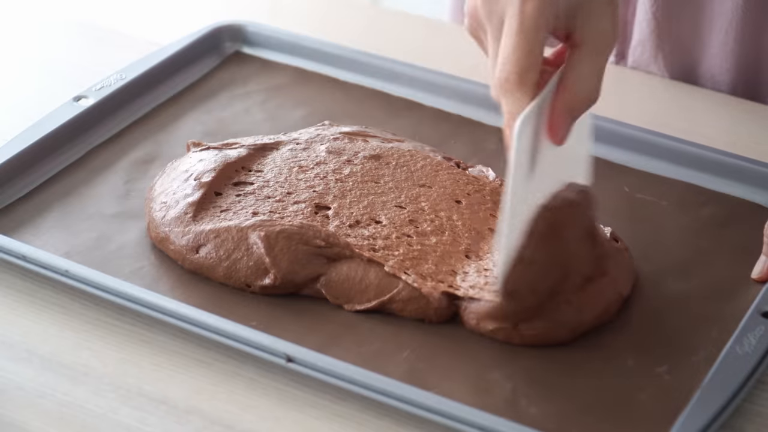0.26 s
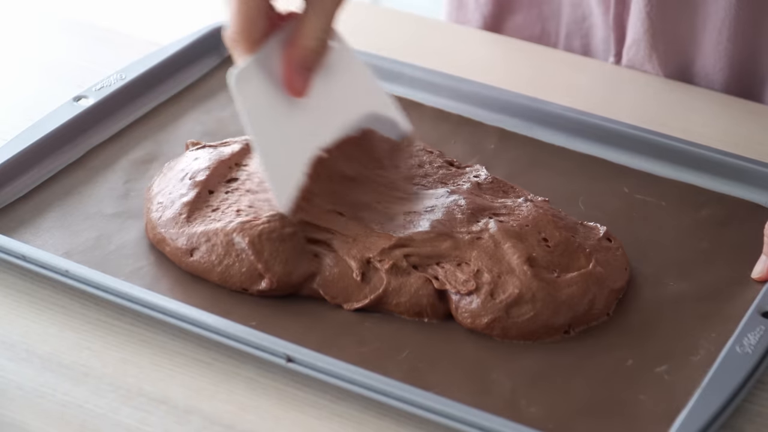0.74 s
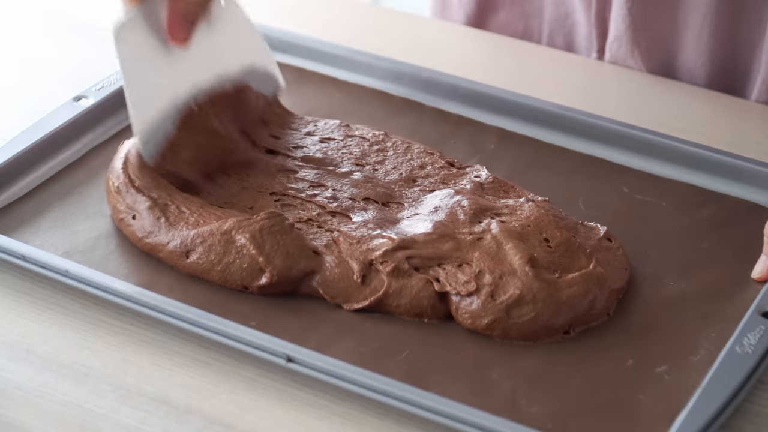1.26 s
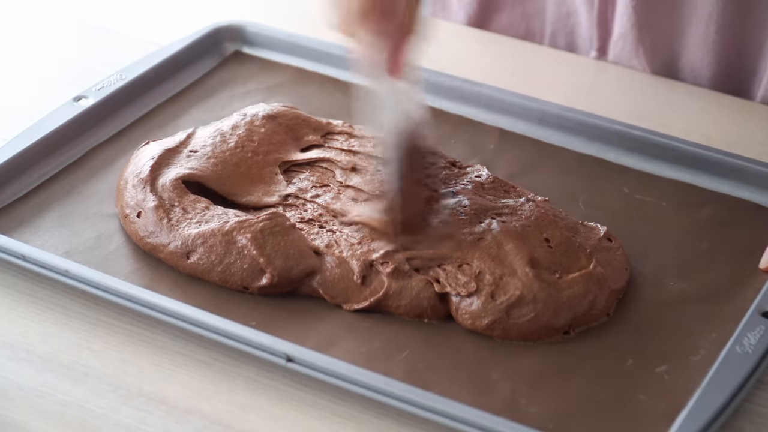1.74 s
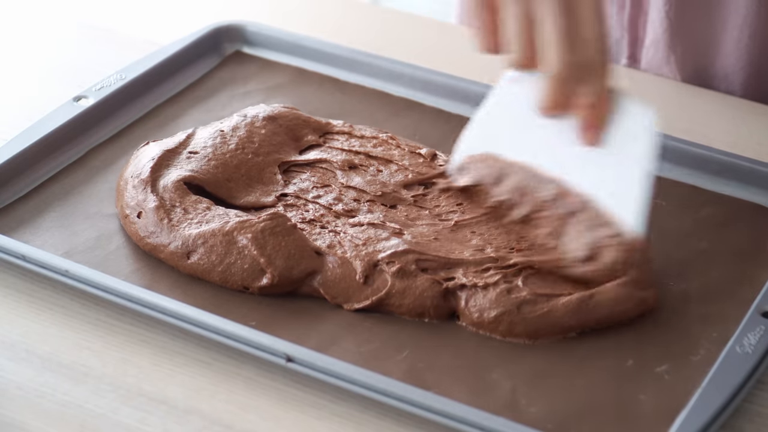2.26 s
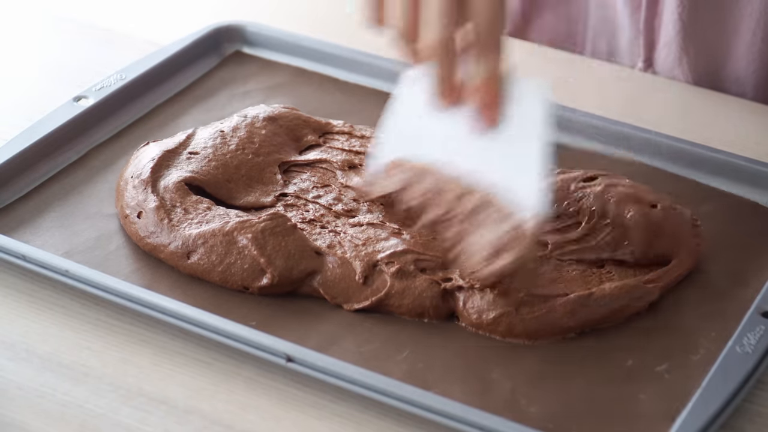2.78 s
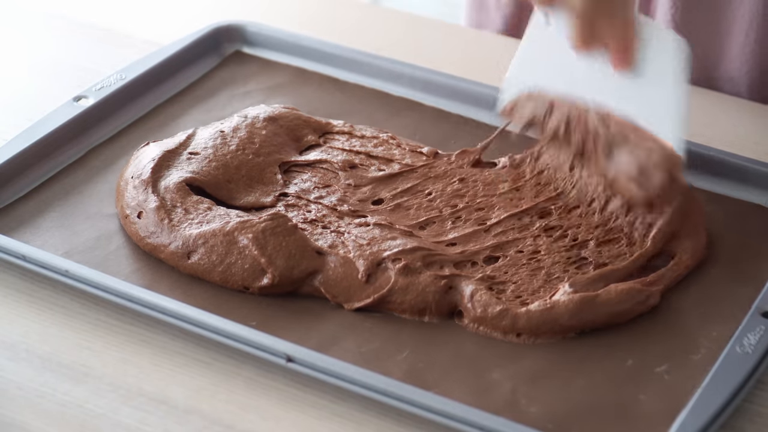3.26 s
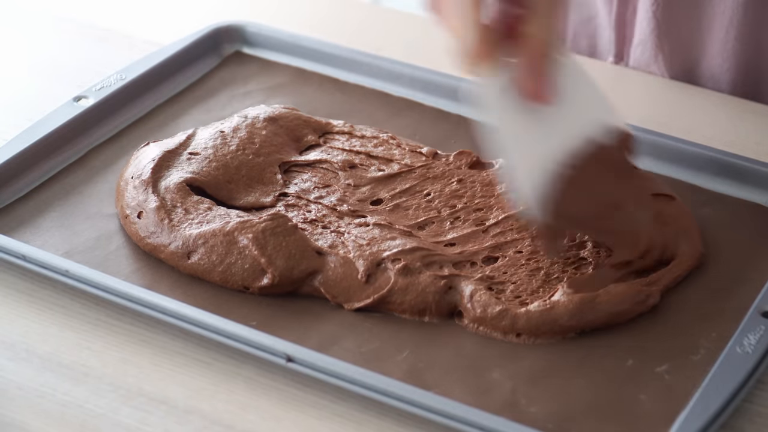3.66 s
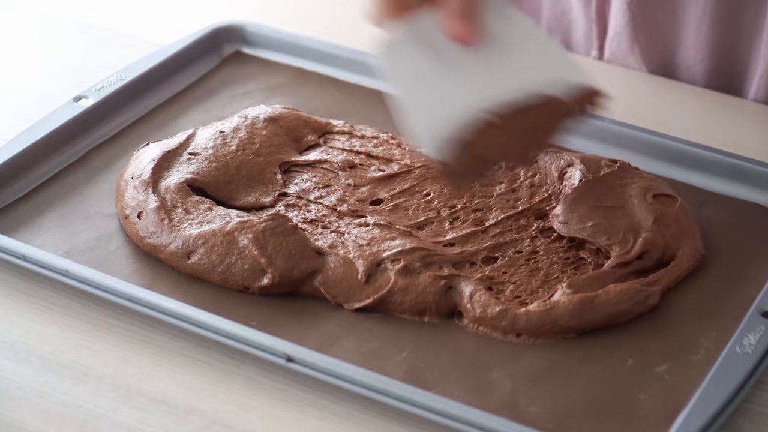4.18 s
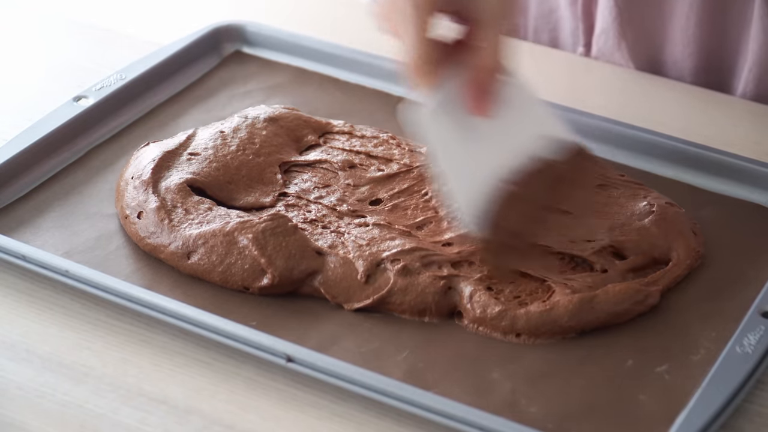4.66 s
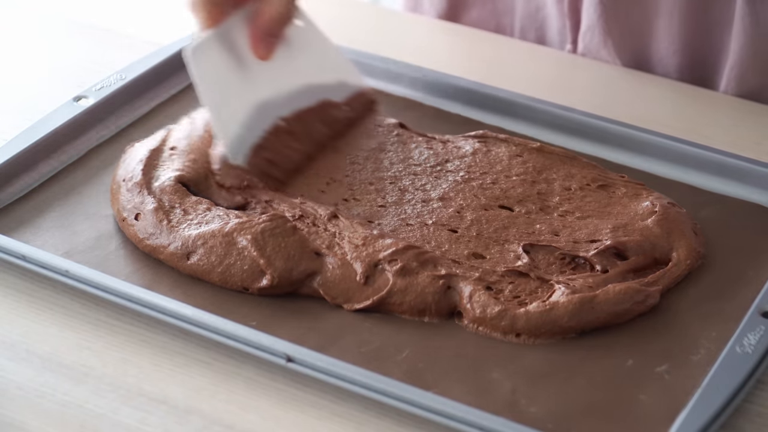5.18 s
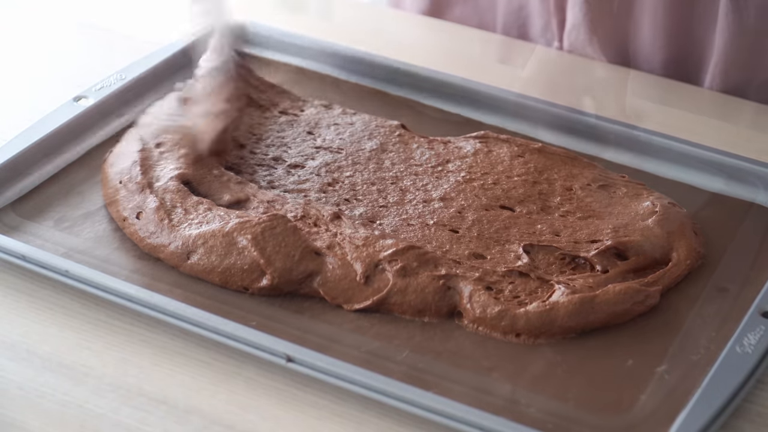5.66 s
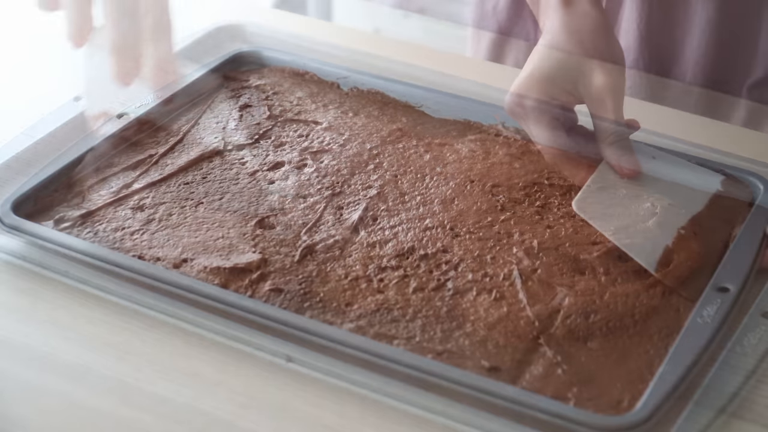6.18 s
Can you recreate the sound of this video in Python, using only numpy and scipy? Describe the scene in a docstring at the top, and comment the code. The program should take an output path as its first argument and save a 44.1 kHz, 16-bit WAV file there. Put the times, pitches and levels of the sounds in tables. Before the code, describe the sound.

A plastic scraper spreads airy chocolate batter over a lined baking sheet with wet, crackling swishes, pops and knocks, then a sudden cut to near quiet.

```python
"""Scraper spreading airy batter

A plastic scraper spreads thick batter over a lined baking sheet, close to a microphone.
Sheared air pockets burst as coloured pulses; pushes and knocks ring the modes of sheet and table.
Scraper taps ring short modes; the kitchen is shaped noise over a wavering motor hum.
Near the end a hard cut leads to a quieter scene with two soft taps of the scraper."""
import sys
import numpy as np
from scipy import signal
from scipy.fft import rfft, irfft
from scipy.io import wavfile
from scipy.ndimage import uniform_filter1d

SR = 44100
rng = np.random.default_rng(int(sys.argv[2]) if len(sys.argv) > 2 else 0)


def generate_wav(signal):
    """Clip the signal to [-1, 1] and save it as 16-bit WAV at the path in sys.argv[1]."""
    frames = np.transpose(np.atleast_2d(signal))
    scaled = np.clip(frames, -1, 1) * 32767
    pcm = np.round(scaled).astype(np.int16)
    wavfile.write(sys.argv[1], SR, pcm)


N = 283122
T_S = np.arange(N) / SR
CUT_S, FADE_IN_S = 5.572, 0.025
BEFORE_CUT = T_S < CUT_S

# Room tone spectrum. Each row: frequency in Hz, relative density in dB per Hz.
KITCHEN_SPECTRUM = [(60, -22.5), (110, -7), (140, -11), (240, -17.5), (850, -28), (1100, -25), (1600, -32),
                    (3600, -32), (5300, -37), (16000, -43.5)]
# Room tone level in dB: before the cut, after the cut.
KITCHEN_LEVEL_DB = (-63, -69.5)
# Appliance motor hum. Each row: frequency in Hz, RMS level in dB before the cut, the same after.
MOTOR_HUM = [(48.2, -70.5, -61.5), (99.4, -90.5, -73)]

# Hand pressure shaking sheet and table, one list per scene.
# Each row: time in seconds, table level in dB, sheet level in dB.
HAND_PRESSURE = [
    [(0.015, -62, -66), (0.165, -55, -58), (0.324, -68, -66), (0.519, -56.5, -60), (0.74, -69, -61.5),
     (0.998, -59, -58), (1.297, -67, -65.5), (1.502, -63, -52.5), (1.701, -51, -72), (1.906, -59, -68),
     (2.045, -53, -57), (2.325, -50.5, -62), (2.8, -62, -64), (3.462, -57.5, -63), (3.986, -64, -69.5),
     (4.5, -55.5, -64.5), (4.759, -62.5, -59.5), (5.547, -59, -68)],
    [(5.612, -63, -84), (6.101, -68, -66), (6.405, -75, -82)],
]
# Knocks on the sheet. Each row: start in seconds, blow level in dB before the mode gains,
# table share in dB before its gain, contact in ms.
SHEET_KNOCKS = [(0.483, -42, -9, 3.8), (0.944, -49.5, 0.5, 13), (0.983, -48, 1, 11.2),
                (1.449, -35, -20, 6.9), (1.484, -42, -11, 2.9), (1.595, -46, -0.5, 4.8),
                (1.641, -60, 0, 4.8), (2.0994, -20, -12.5, 4), (2.809, -52.5, -3, 4.8),
                (6.083, -46.5, -13.5, 3.7)]
# Table modes. Each row: nominal frequency in Hz, level in dB, t60 in seconds when knocked.
TABLE_MODES = [(40.36, 5, 0.65), (51.4, -19, 0.31), (65.1, 4, 0.19)]
# Sheet modes. Each row: nominal frequency in Hz, level in dB, t60 in seconds when knocked.
SHEET_MODES = [(130, 0, 0.19), (162.2, -3, 0.27), (286, -16, 0.45), (385.6, -14.5, 0.34)]

# Scraper taps. Each row: time in seconds, nominal level in dB, pitch scale, brightness in dB per octave.
SCRAPER_TAPS = [(.2185, -45.5, 1.15, 7), (.4853, -39, 0.82, -10.5), (1.4605, -46.5, 1, 4),
                (2.0980, -43.5, 1.8, 19), (2.4080, -47.5, 1.08, -15), (2.7083, -44, 0.94, -2),
                (2.7935, -45.5, 0.96, 0.5), (3.0188, -37, 0.98, -5), (5.3312, -48.5, 0.95, 4),
                (5.8757, -43, 1.13, 7), (6.0792, -44, 1.04, -10.5)]
# Scraper modes. Each row: frequency in Hz before the pitch scale, level in dB before tilt, t60 in seconds.
SCRAPER_MODES = [(312.6, -18, 0.41), (387, -3, 0.094), (505, -2, 0.046), (600, 4.5, 0.027),
                 (706, 12.5, 0.022), (1003, 2, 0.034), (1047, -3, 0.029), (2300, -16, .012),
                 (3400, -20, .01)]

# Single pops, and last the faint tick of a scraper tap. Each row: time in seconds,
# pulse level in dB before the colour gains, fizz relative to it in dB, low body relative to it in dB.
SINGLE_POPS = [(0.142, -38, -12, -8), (0.1483, -35, -12, -11), (0.1805, -34.5, -15, -8.5),
               (0.3277, -40, 1, -21), (0.4305, -47.5, 6.5, -12), (0.4885, -34.5, -8, -5),
               (0.617, -41.5, -13, -9), (0.777, -29, -8, -5.5), (0.7953, -30, -10, -12.5),
               (0.986, -45, 1, -4), (1.027, -42.5, -12.0, -3), (1.103, -44, -2, -20),
               (1.1156, -39.5, -11, -23), (1.143, -39.5, -7, -11), (1.2157, -40, -23, -8),
               (1.8395, -43, -3, -23), (1.9215, -40.5, -11, -5.5), (2.0975, -33, -24, 4.5),
               (2.154, -35, -5, -13), (2.2154, -37.5, -1, -5), (2.2253, -45, -10.0, 1.5),
               (2.252, -35.5, -2, -26), (2.594, -42, -6, -20), (2.677, -39.5, -19, -22),
               (2.7239, -39, -18.0, -23), (2.9618, -41, -20, -15.0), (3.0192, -37.5, -3, -3),
               (3.3037, -40, -9.0, -24), (4.5499, -51.5, -13.0, -1), (4.613, -53, -16.0, 6),
               (4.7388, -38, -14, -5), (4.823, -38, -1, -15), (5.067, -36, -23, -12.0),
               (5.26, -43, -15.0, -12), (5.332, -43, 2, -11), (6.0796, -56, -25.0, -24)]
# Burst spectra: mid crackle, bright fizz, low squelch, upper-mid smear.
# Each row: frequency in Hz, relative level in dB.
CRACKLE_SPECTRUM = [(1200, -18), (2200, -7.5), (2800, -1.5), (3400, 2.5), (4100, 0), (4900, -13),
                    (6500, -15), (9000, -45.5)]
FIZZ_SPECTRUM = [(3000, -36), (5000, -4.5), (6500, -4), (9000, -4), (13000, -4.5), (16000, -6)]
SQUELCH_SPECTRUM = [(150, -10), (300, 3.5), (500, -1), (750, 0), (1100, 0.5), (1600, -14), (3000, -27.5)]
SMEAR_SPECTRUM = [(600, -31.5), (1200, 8), (1600, 0.5), (2200, 2), (3000, -1.5), (5000, -43.5)]
# Blade strokes through the batter. Each row: time of full level in seconds, rise in seconds per 20 dB,
# hold in seconds, fall in seconds per 20 dB, then crackle, fizz, squelch and smear gains in dB.
BLADE_STROKES = [(0.0, .1, 0.28, 0.15, -52.5, -58.5, -58.5, -58.5),
                 (0.8, 0.94, 0.2, 0.64, -63, -67, -60, -63.5),
                 (1.13, 0.52, 0.095, 0.56, -59.5, -68, -62.5, -63),
                 (1.55, 0.15, .02, .12, -63.5, -83, -51.5, -56.5),
                 (1.73, 0.22, 0.007, 0.2, -55, -59, -75, -76),
                 (1.91, 0.25, .01, .2, -60.5, -62.5, -76, -67),
                 (1.985, 0.046, 0.091, .1, -55.5, -66.5, -59.5, -64),
                 (2.11, 0.064, 0.06, 0.014, -51.5, -71, -59.5, -62),
                 (2.46, .37, 0.038, 0.12, -48, -52.5, -55, -53), (2.66, .12, .02, 0.24, -59, -63, -64, -62),
                 (3.08, 0.15, 0.024, 0.34, -48.5, -52, -53.5, -51.5),
                 (3.437, 0.087, .15, .03, -58, -66.5, -72, -72.5),
                 (3.727, 0.15, .02, 0.14, -64, -68, -59.5, -58.5),
                 (3.87, 0.42, 0.044, 0.18, -75, -71, -82, -83),
                 (4.02, 0.081, 0.045, .07, -67.5, -67.5, -74, -74),
                 (4.82, 0.27, 0.064, 0.54, -52.5, -60, -52.5, -52),
                 (5.1, 0.28, 0.17, 0.41, -59, -70, -62.5, -64),
                 (5.38, 0.33, 0.061, 0.46, -60.5, -65.5, -61, -60.5),
                 (6.24, .13, .01, 0.26, -75, -99, -99, -99)]
# Brief touches of the blade, some crackling, some squelchy. Each row: time of full level in seconds,
# rise in seconds per 20 dB, then crackle, fizz, squelch and smear gains in dB.
BLADE_TOUCHES = [(0.445, 0.037, -57.5, -66, -54, -64), (0.619, 0.038, -64.5, -76, -55.5, -65),
                 (1.47, 0.07, -63, -63.5, -66, -67), (1.594, .004, -52, -52.5, -68, -70),
                 (1.638, .02, -59, -70, -55.5, -55), (2.03, 0.033, -59, -74, -55, -53.5),
                 (2.099, 0.032, -43, -53.5, -55, -54), (2.789, 0.044, -58.5, -60.5, -58.5, -57.5),
                 (3.41, .012, -51, -64, -71, -64), (4.285, 0.047, -58, -83, -58, -57),
                 (4.378, 0.035, -57, -84, -57.5, -55.5), (4.448, 0.025, -61.5, -81, -61.5, -60.5),
                 (4.729, 0.054, -55, -86, -66, -56)]
# Batter at rest before the cut. One row: crackle, fizz, squelch and smear gains in dB.
REST_GAIN_DB = (-72.5, -74, -71.5, -73)

REST_AFTER_CUT_DB = -85
TOUCH_HOLD_S, TOUCH_FALL_S = 0.0021, 0.05  # fall per 20 dB
LOUDEST_BURST_DB = 16
POP_CRACKLE_DB, POP_FIZZ_DB, POP_SQUELCH_DB, POP_SMEAR_DB = 10.5, 7, 12, 13.5
MODE_SPREAD_S = 0.0004
TAP_MS, BLADE_HZ = 0.36, 271
RUMBLE_DB, RUMBLE_T60_S = -9, 0.3
ROOM_DB, ROOM_T60_S = -16.5, 0.027
BASS_HZ, TOP_HZ = 30.7, 15720


def undb(db):
    """Amplitude of a level in dB."""
    return 10 ** (np.asarray(db) / 20)


def unit(x):
    """Scale to unit RMS."""
    return x / np.sqrt(np.mean(x ** 2))


def columns(scenes):
    """Interpolate the level columns of all scenes to every sample."""
    rows = np.concatenate([np.array(s, float) for s in scenes])
    return [np.interp(T_S, rows[:, 0], column) for column in rows.T[1:]]


def colour(x, points, size=4096):
    """Causal filter of unit energy through (Hz, dB) points, from the cepstrum of the log gain."""
    hz, db = np.transpose(points)
    bin_hz = np.arange(size // 2 + 1) * SR / size
    gain_db = np.interp(np.log(bin_hz + 1), np.log(hz), db)
    cepstrum = irfft(gain_db * np.log(10) / 20)
    cepstrum[1:size // 2] *= 2  # fold to minimum phase
    cepstrum[size // 2 + 1:] = 0
    h = irfft(np.exp(rfft(cepstrum)))[:size // 2]
    return signal.fftconvolve(x, h / np.sqrt(np.sum(h ** 2)))[:N]


def ring(x, modes, scale=0.99, tilt_db=0.):
    """Decaying modes excited by x; scale multiplies pitch, tilt is in dB per octave about 700 Hz."""
    hz, db, t60_s = np.transpose(modes)
    # slow bending waves: the lows set in later
    onset_s = np.linspace(0, MODE_SPREAD_S, len(modes))[::-1]
    late_s = (np.arange(SR) / SR)[:, None] - onset_s
    gain = undb(db + tilt_db * np.log2(hz / 700))
    h = gain * np.sin(2 * np.pi * hz * scale * late_s) * 1000. ** (-late_s / t60_s)
    return signal.fftconvolve(x, (h * (late_s > 0)).sum(axis=1))[:N]


def walk(rate_hz):
    """Random levels of unit RMS, each held 1 / rate and slewed."""
    hold = int(SR / rate_hz)
    steps = np.repeat(rng.standard_normal(N // hold + 1), hold)
    return unit(uniform_filter1d(steps, hold)[:N])


def at(times_s, sizes):
    """A train of one-sample pulses."""
    return np.bincount((np.asarray(times_s) * SR).astype(int), sizes, N)[:N]


def contact(x, ms):
    """Spread each pulse over the contact time; a softer contact pushes longer."""
    push = np.hanning(max(int(ms * SR / 1000), 3))
    return signal.fftconvolve(x, push / push.sum())[:N]


def echo(x, t60_s):
    """Dense decaying reflections of unit energy."""
    t = np.arange(SR // 2) / SR
    tail = rng.standard_normal(len(t)) * 1000. ** (-t / t60_s) * (t > 0.0015)
    return signal.fftconvolve(x, tail / np.sqrt(np.sum(tail ** 2)))[:N]


def kitchen():
    """Steady room tone that swells a little, over a motor hum that wavers."""
    tone = unit(colour(rng.standard_normal(N), KITCHEN_SPECTRUM))
    out = tone * undb(np.where(BEFORE_CUT, *KITCHEN_LEVEL_DB) + 2.0 * walk(4.8))
    for hz, before_db, after_db in MOTOR_HUM:
        level_db = np.where(BEFORE_CUT, before_db, after_db) + 1.0 * walk(3.4)
        sine = np.sin(2 * np.pi * (hz * T_S + rng.random()))
        out += undb(level_db) * np.sqrt(2) * sine
    return out


def shaking(modes, t60_scale):
    """Noise from a pressing hand rings the modes, with shortened decays; unit RMS."""
    shortened = [(hz, db, t60_scale * t60_s) for hz, db, t60_s in modes]
    return unit(ring(rng.standard_normal(N), shortened))


def sheet():
    """The pressing hand shakes table and sheet all along; knocks set them ringing."""
    table_db, sheet_db = columns(HAND_PRESSURE)
    out = undb(table_db) * shaking(TABLE_MODES, 0.61)
    out += undb(sheet_db) * shaking(SHEET_MODES, 0.14)
    for s, db, share_db, ms in SHEET_KNOCKS:
        blow = contact(at([s], [undb(db)]), ms)
        out += undb(-2.5) * ring(blow, SHEET_MODES)
        out += undb(share_db + 3.0) * ring(blow, TABLE_MODES)
    return out


def scraper():
    """The plastic blade taps and rings; batter on it shifts and dulls the ring, the sheet rumbles after."""
    taps = np.zeros(N)
    for s, db, scale, tilt_db in SCRAPER_TAPS:
        taps += ring(at([s], [-undb(db - 12.0)]), SCRAPER_MODES, scale, tilt_db)
    taps = contact(taps, TAP_MS)
    # a small blade radiates no bass
    taps = signal.sosfilt(signal.butter(2, BLADE_HZ, "high", fs=SR, output="sos"), taps)
    return taps + undb(RUMBLE_DB) * echo(taps, RUMBLE_T60_S)


def pops():
    """Single pockets, and last a faint tap tick, are coloured pulses; large pockets have a low body."""
    s, db, fizz_db, body_db = np.transpose(SINGLE_POPS)
    body = at(s, undb(db + body_db))
    out = undb(POP_CRACKLE_DB) * colour(at(s, undb(db)), CRACKLE_SPECTRUM)
    out += undb(POP_FIZZ_DB) * colour(at(s, undb(db + fizz_db)), FIZZ_SPECTRUM)
    out += undb(POP_SQUELCH_DB) * colour(body, SQUELCH_SPECTRUM)
    out += undb(POP_SMEAR_DB) * colour(body, SMEAR_SPECTRUM)
    return out


def bursts(per_s, spread_db, patchy_db, hiss):
    """Outward pressure pulses of bursting pockets, in patches, over the hiss of those too small to tell apart."""
    patch = undb(patchy_db * walk(45))
    size_db = np.minimum(spread_db * rng.exponential(size=N), LOUDEST_BURST_DB)
    pulses = (rng.random(N) < per_s / SR) * undb(size_db)
    return unit(patch * (unit(pulses - pulses.mean()) + hiss * rng.standard_normal(N)))


def shear():
    """Crackle, fizz, squelch and smear gains: strokes and touches rise, hold and fall over the batter at rest."""
    rows = list(BLADE_STROKES)
    rows += [(s, rise_s, TOUCH_HOLD_S, TOUCH_FALL_S, *db) for s, rise_s, *db in BLADE_TOUCHES]
    rest_db = np.where(BEFORE_CUT, np.array(REST_GAIN_DB)[:, None], REST_AFTER_CUT_DB)
    power = undb(rest_db) ** 2
    for s, rise_s, hold_s, fall_s, *db in rows:
        slope = np.maximum((s - T_S) / rise_s, (T_S - s - hold_s) / fall_s)
        shape_db = -20 * np.maximum(slope, 0)
        same_scene = BEFORE_CUT == (s < CUT_S)
        power += (undb(db) ** 2)[:, None] * (undb(shape_db) ** 2 * same_scene)
    return np.sqrt(power)


def batter():
    """All colours share the same bursts; until the cut small pockets add fizz, large ones squelch and smear."""
    crackle, fizz, squelch, smear = shear()
    shared = bursts(per_s=1200, spread_db=4.5, patchy_db=1.5, hiss=0.59)
    small = bursts(per_s=5000, spread_db=4.0, patchy_db=0.97, hiss=0.47)
    large = bursts(per_s=400, spread_db=4.5, patchy_db=2.5, hiss=0.68)
    fine = (0.4 * shared + 1.074 * small) * BEFORE_CUT
    wet = (0.44 * shared + 0.75 * large) * BEFORE_CUT
    out = colour(crackle * shared, CRACKLE_SPECTRUM)
    out += colour(fizz * fine, FIZZ_SPECTRUM)
    out += colour(squelch * wet, SQUELCH_SPECTRUM)
    out += colour(smear * wet, SMEAR_SPECTRUM)
    return out


def scene():
    """Sum all sources; batter and pops also reflect briefly from sheet, table and walls."""
    near = batter() + pops()
    reflections = undb(ROOM_DB) * echo(near, ROOM_T60_S)
    return (kitchen() + sheet() + scraper() + near + reflections)[None]


def record(dry):
    """The first scene is cut dead, the second fades in; the microphone drops deep bass, the top is cut off."""
    fade_in = np.clip((T_S - CUT_S) / FADE_IN_S, 0, 1)
    joined = dry * np.where(BEFORE_CUT, 1, fade_in)
    thin = signal.sosfilt(signal.butter(4, BASS_HZ, "high", fs=SR, output="sos"), joined)
    return signal.sosfilt(signal.ellip(10, 0.2, 60, TOP_HZ, fs=SR, output="sos"), thin)


dry = scene()
out = record(dry)
generate_wav(out)
```